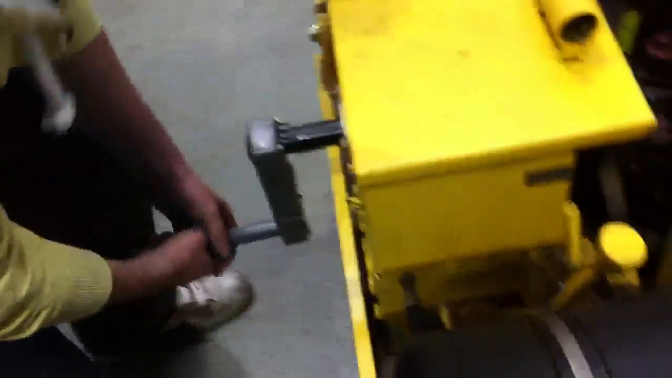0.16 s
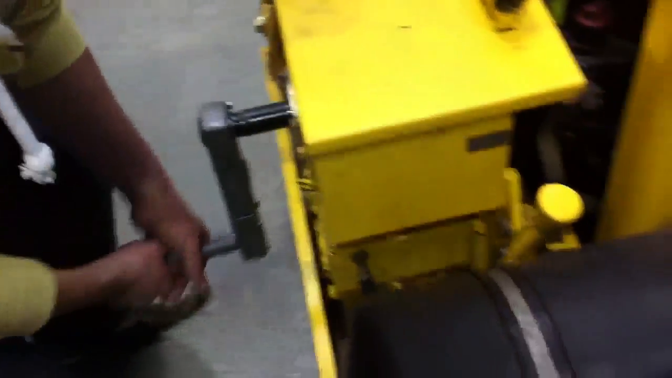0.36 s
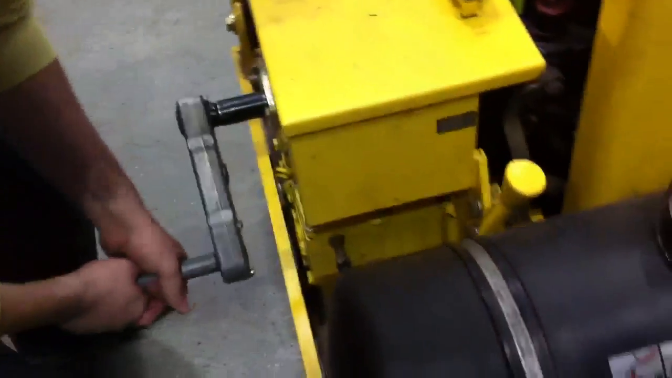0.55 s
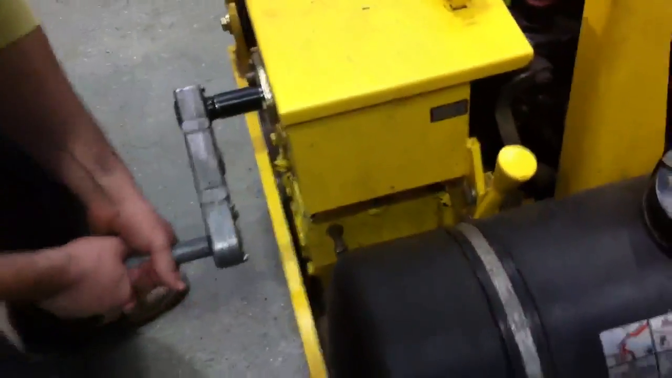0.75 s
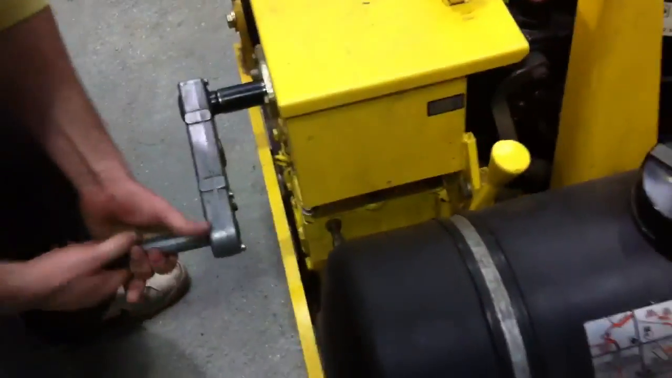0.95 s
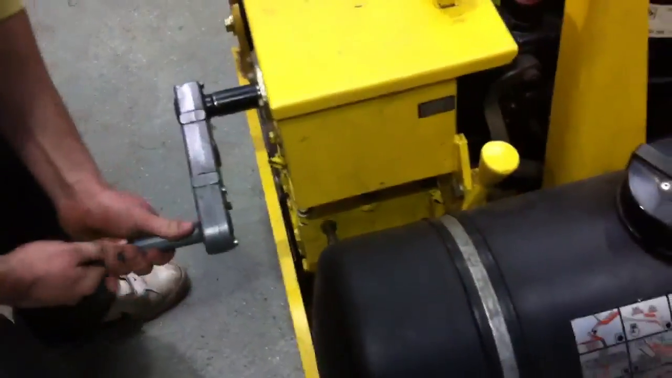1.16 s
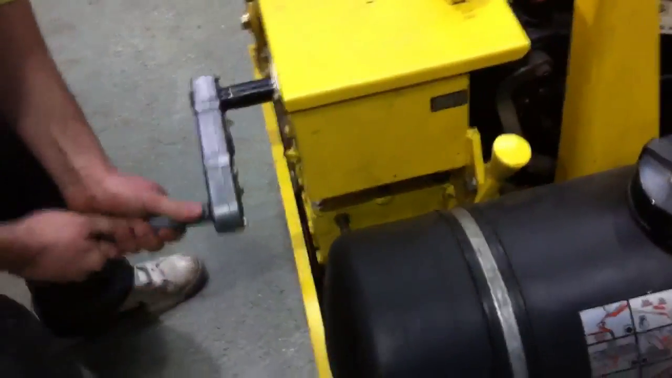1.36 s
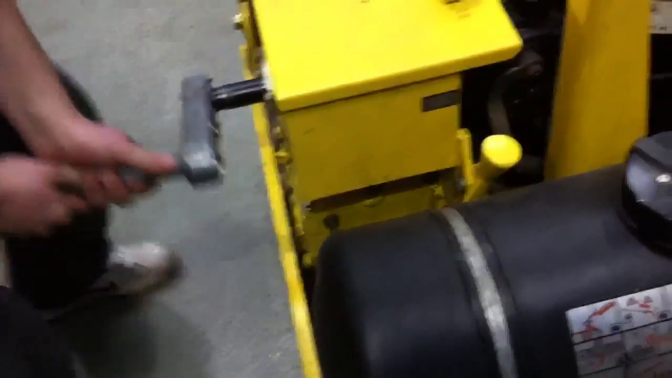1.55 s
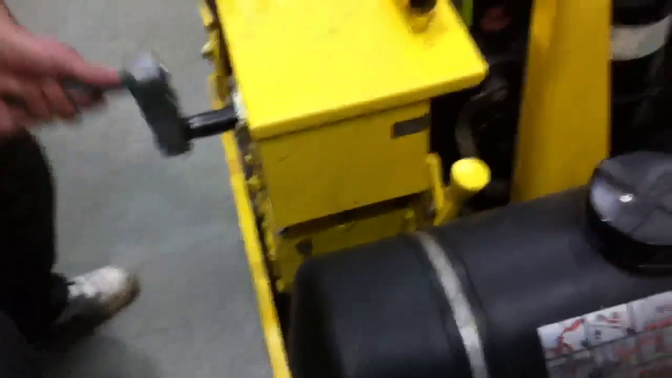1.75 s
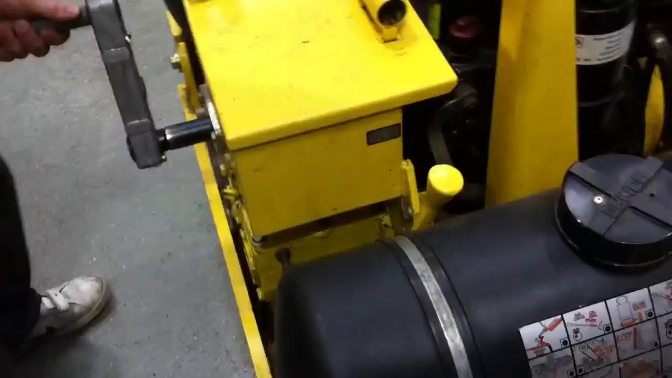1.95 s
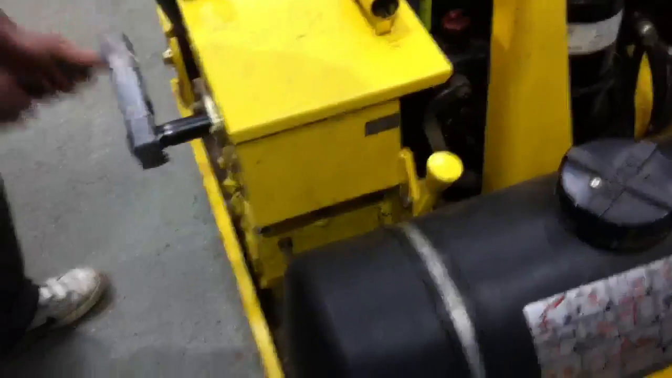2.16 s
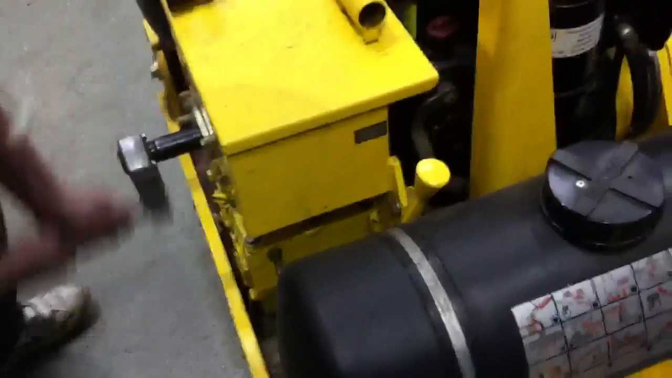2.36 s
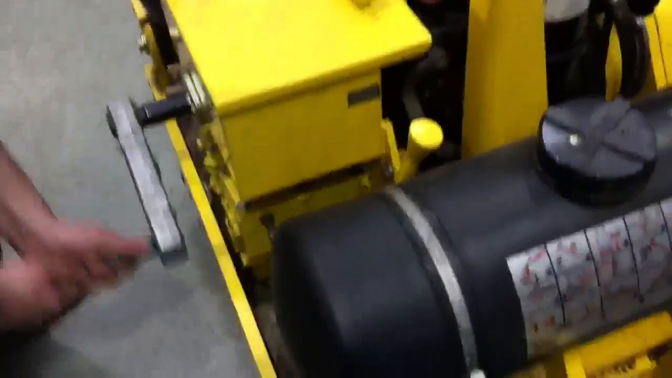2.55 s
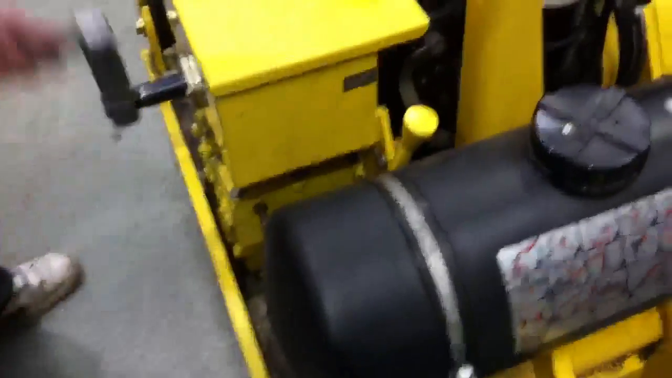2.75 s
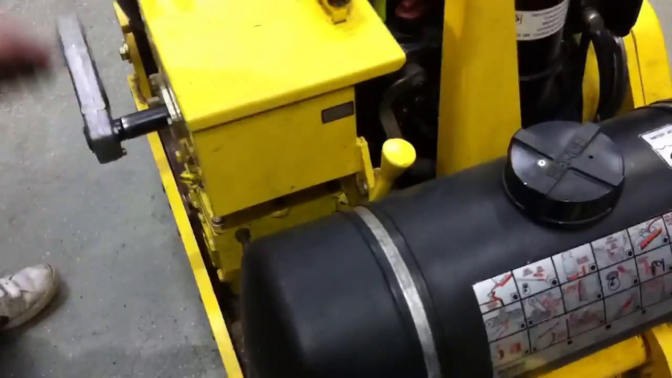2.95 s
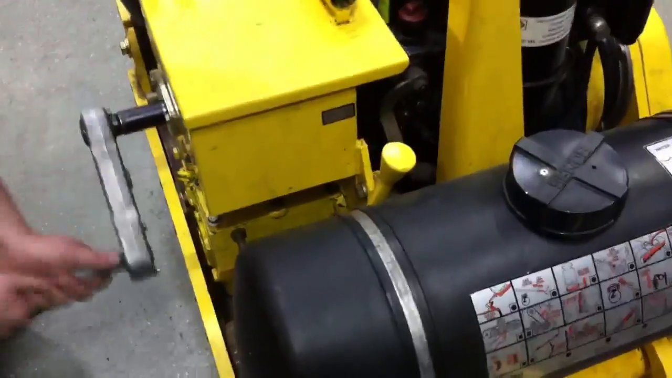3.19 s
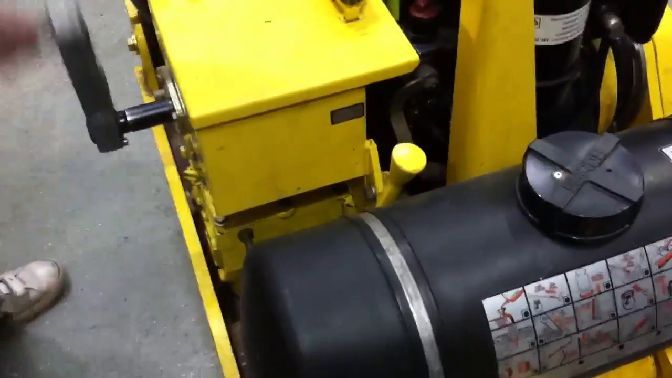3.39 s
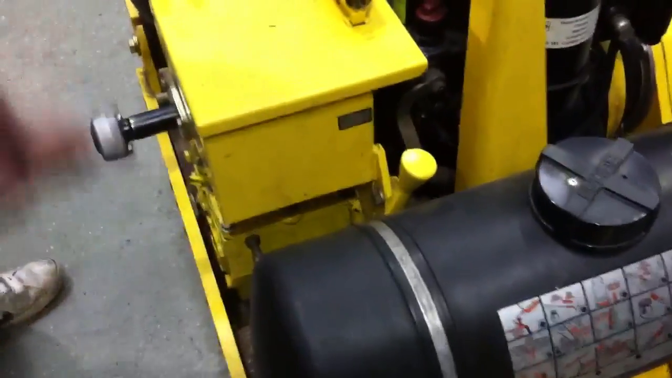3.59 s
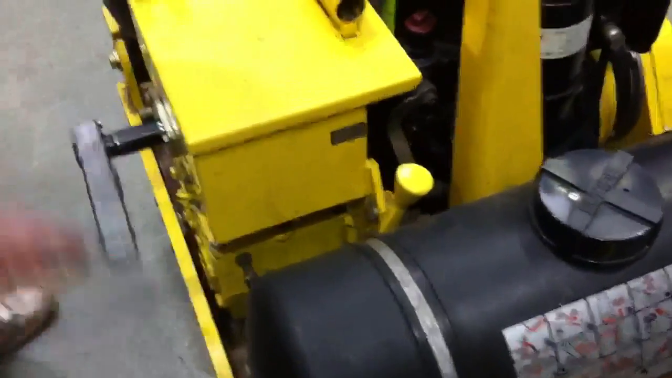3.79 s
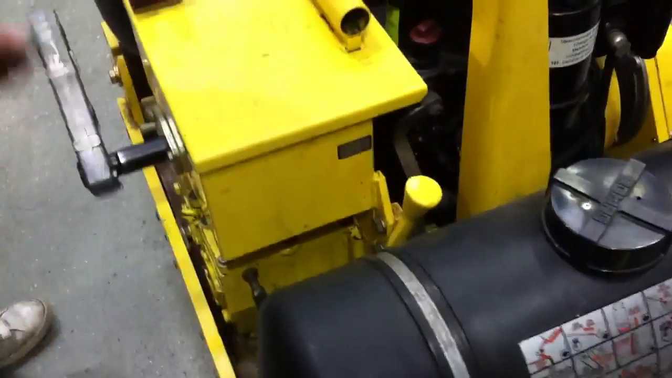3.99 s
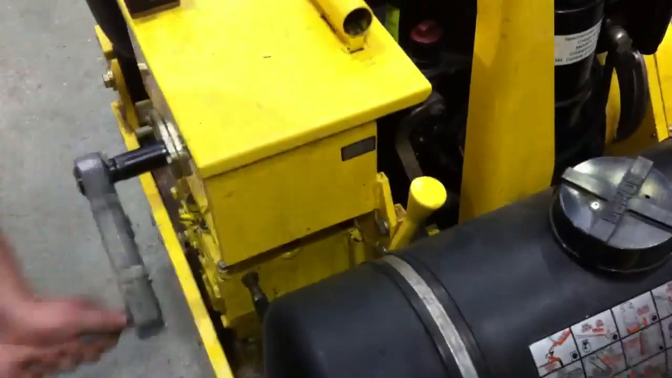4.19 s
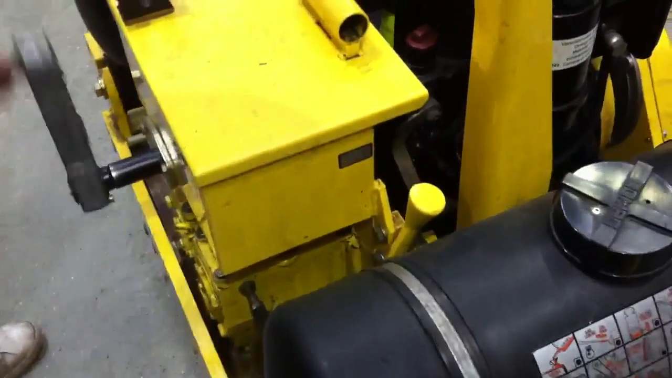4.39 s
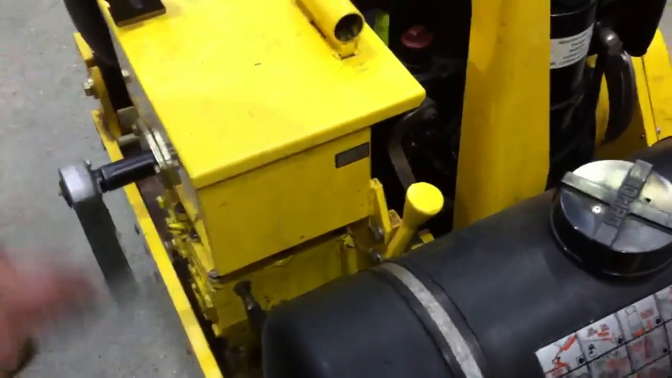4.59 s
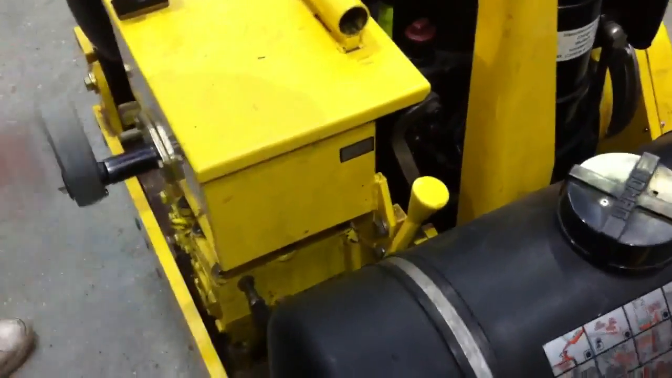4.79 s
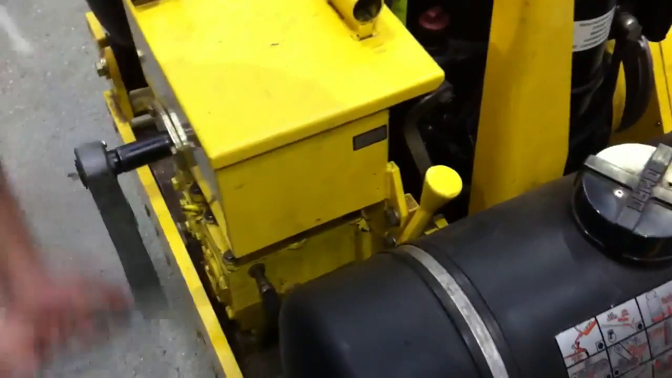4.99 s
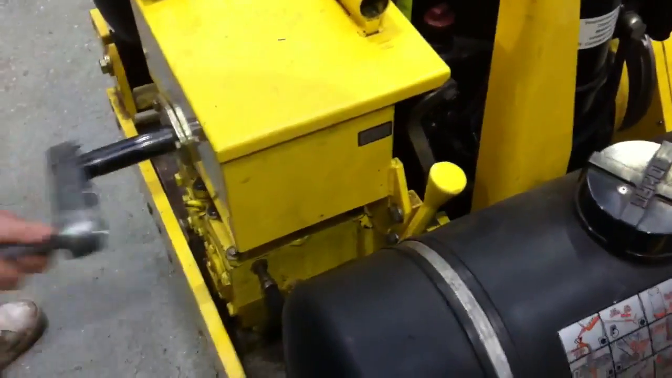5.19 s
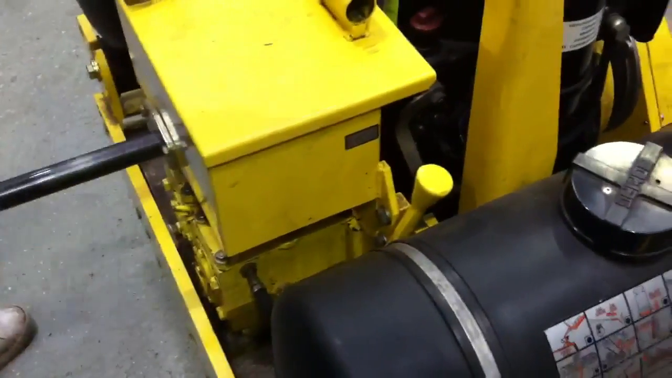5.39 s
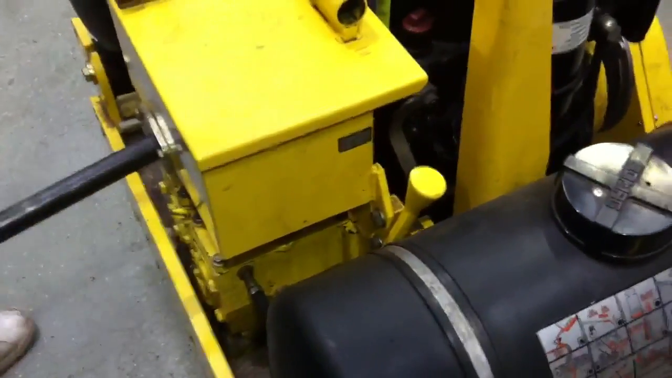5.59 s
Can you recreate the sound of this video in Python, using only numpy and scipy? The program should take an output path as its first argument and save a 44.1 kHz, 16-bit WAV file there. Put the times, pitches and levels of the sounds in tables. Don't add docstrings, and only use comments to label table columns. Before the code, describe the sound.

A small diesel engine is hand-cranked close to the microphone in a workshop with hard walls. For the first 1.6 seconds it is nearly quiet: low distant rumble, faint brushing sleeves, small bumps at 0.1 and 0.3, a clear metal knock at 0.7 as the handle meets its socket, and dull settling until 0.9. At about 1.6 slack is taken up and a pawl starts ticking, crisp and bright, slowly at first, then quickening to a dense rattle by 3 seconds. It surges with each turn, the turns shortening from about 0.6 to 0.45 seconds. Gears hiss and whirr; valves clack hollowly, strongly at 2.8 and 4.7. From 4.9 heavy firings hammer through the booming sheet-metal casing in uneven clusters. Loose parts ping sharply at 5.2 and 5.3, the ticking weakens and stops near 5.3, and a low, rumbling exhaust throb swells until the abrupt end around 5.6.

```python
import sys
import numpy as np
from scipy import signal
from scipy.io import wavfile
from scipy.ndimage import uniform_filter1d, minimum_filter1d

SR = 44100
rng = np.random.default_rng(int(sys.argv[2]) if len(sys.argv) > 2 else 0)


def volts_from_decibels(level):
    exponent = np.asarray(level, float) / 20
    return 10 ** exponent


def store_wav(level_fs):
    pcm = np.round(np.clip(np.atleast_2d(level_fs), -1, 1) * 32767)
    wavfile.write(sys.argv[1], SR, pcm.T.astype(np.int16))


N = 248724


def evened(x):
    return x / np.sqrt(np.mean(x ** 2) + 1e-20)


def ramp(from_s, to_s):
    return np.interp(np.arange(N) / SR, [from_s, to_s], [0, 1])


def after(start_s):
    return 1.0 * (np.arange(N) / SR > start_s)


def band(x, low_hz, high_hz):
    return signal.sosfilt(signal.butter(2, [low_hz, high_hz], "band", fs=SR, output="sos"), x)


def body(drive, modes, wander_db=0):
    out, click = 0, signal.unit_impulse(8192)
    for hz, width_hz, level_db in modes:
        r = np.exp(-np.pi * width_hz / SR)
        poles = [1, -2 * r * np.cos(2 * np.pi * hz / SR), r * r]
        wander = np.interp(np.arange(N), np.linspace(0, N, num=60), rng.standard_normal(60))
        struck = np.r_[click, drive * volts_from_decibels(wander_db * wander)]
        out = out + volts_from_decibels(level_db) * (1 - r) * signal.lfilter([1, 0, -1], poles, struck)
    return out[len(click):] / np.linalg.norm(out[:len(click)])


def noise(points, patchy_db):
    frames, hz = N // 256 + 5, np.fft.rfftfreq(1024, 1 / SR)
    a, b, patches = rng.standard_normal((frames, 513, 3)).T
    patches = uniform_filter1d(patches, size=10, axis=0)
    patches = evened(uniform_filter1d(patches, size=8, axis=1))
    f, db = np.transpose(points)
    shape_db = np.interp(np.log(hz + 1), np.log(f), db)[:, None]
    z = (a + 1j * b) * volts_from_decibels(shape_db + patchy_db * patches)
    return evened(signal.istft(z, nperseg=1024, noverlap=768)[1][:N])


def lumpy(per_s, spread_db):
    size = volts_from_decibels(spread_db * np.minimum(rng.exponential(1, N), 4)) * rng.choice([-1., 1.], N)
    return evened(size * (rng.random(N) < per_s / SR))


# pitch_hz, level_db (per Hz)
RUMBLE = [(15, -60), (25, -28), (97, -13.5), (149, -22), (185, 0), (217, -6.5), (416, -15.5), (714, -16.5),
          (1480, -25.5), (1610, -23.5), (1940, -28.5), (12900, -41), (16000, -43)]
# pitch_hz, level_db (per Hz)
RUSTLE = [(1200, -23), (2500, -2.5), (4000, -4), (7000, -7), (11000, -10), (15500, -15)]
# peak_s, level_db, fall_db_per_s
RUSTLES = [
    (0, -58, 45),
    (.69, -72, 300),
    (1.016, -58.5, 108),
    (1.288, -64, 55),
]


def shop():
    t = np.arange(N) / SR
    rumble = volts_from_decibels(-45.5 - 2 * after(1.25))
    rustle = sum(volts_from_decibels(level_db - fall_db * abs(t - s)) for s, level_db, fall_db in RUSTLES)
    far = volts_from_decibels(-3.0) * rumble * noise(RUMBLE, patchy_db=1.0)
    return far + volts_from_decibels(6.0) * rustle * noise(RUSTLE, patchy_db=2.5)


# pitch_hz, t60_s
WALLS = [(200, 0.37), (1000, 0.94), (4000, 0.49), (12000, 0.048)]


def walls(x):
    taps = np.zeros(SR // 2)
    at = np.arange(200, len(taps) - 20, 20)
    taps[at + rng.integers(0, 20, len(at))] = rng.choice([-1., 1.], len(at))
    hz, t, z = signal.stft(taps, SR, nperseg=256)
    f, t60 = np.transpose(WALLS)
    dying = volts_from_decibels(-60 * t / np.interp(hz, f, t60)[:, None])
    tail = signal.istft(z * dying, SR, nperseg=256)[1]
    return signal.fftconvolve(x, tail / np.linalg.norm(tail))[:N]


# start_s, pitch_hz, level_db, t60_s
PINGS = [(0.682, 1310, -36, 0.036), (0.682, 2390, -37, 0.023), (2.797, 1530, -28, .06),
         (2.829, 1940, -26, .07), (4.955, 1033, -17.5, 0.4), (5.076, 2650, -29, 0.085),
         (5.214, 3200, -7, 0.027), (5.217, 2840, -3.5, 0.023), (5.332, 3200, -6, 0.034),
         (5.332, 2950, -14, 0.064), (5.345, 3300, -14, 0.065), (5.35, 2000, -12, 0.038),
         (5.529, 1040, -19.5, 0.75), (5.532, 3050, -20, .06), (5.618, 3050, -19, .06)]


def pings():
    out, t = np.zeros(N + SR), np.arange(SR // 2) / SR
    for s, hz, level_db, t60 in PINGS:
        pair = np.sin(2 * np.pi * hz * t) + 0.27 * np.sin(2 * np.pi * 1.024 * hz * t)
        swell = 1 - np.exp(-t / 0.00054)
        out[round(s * SR):][:len(t)] += volts_from_decibels(level_db - 60 * t / t60) * swell * pair
    return out[:N]


# time_s, teeth_passed
GETTING_GOING = [(1.6332, -1), (1.6481, 0), (1.699, 1), (1.786, 3), (1.8225, 4), (1.8927, 6), (1.9216, 7),
                 (2.0276, 11), (2.0768, 13), (2.17, 17), (2.2428, 20), (2.2644, 21), (2.3655, 25),
                 (2.505, 31), (2.6337, 37), (2.7703, 44), (2.853, 49), (3.064, 66)]
TURN_ENDS = [3.064, 3.639, 4.154, 4.608, 5.051, 5.52]
STROKE = [(0, 0), (7, .158), (13, .32), (19, .476), (26, .64), (32, .755), (40, .885), (47, 1)]
TURN_TEETH = 47


def crank():
    s, teeth = np.transpose(GETTING_GOING)
    tooth, share = np.transpose(STROKE[1:])
    for start, end in zip(TURN_ENDS, TURN_ENDS[1:]):
        s = np.r_[s, start + share * (end - start)]
        teeth = np.r_[teeth, teeth[-1] + tooth]
    return s, teeth


# time_s, level_db
EFFORT = [(1.63, -43), (1.8, -29), (2.0, -29), (2.2, -29), (2.6, -25.5), (2.82, -23.5), (2.92, -25),
          (3.3, -23), (4.0, -21.5), (4.7, -22), (4.9, -19.5), (5.03, -20), (5.3, -18.5), (5.64, -18.5)]


def running():
    t = np.arange(N) / SR
    effort = np.interp(t, *np.transpose(EFFORT), left=-120)
    caught = ramp(5.14, 5.48)
    angle = np.interp(t, *crank())
    heave_db = 8 - 4 * ramp(2.4, 3.4) - 4 * caught
    heave = heave_db * np.cos(8 * np.pi * (angle - 10.5) / TURN_TEETH)
    sway_db = 1.5 * ramp(2.35, 3.0) * (1 - caught)
    sway = sway_db * np.cos(2 * np.pi * (angle - 8.1) / TURN_TEETH)
    shake = -14.5 + 10.5 * caught + sway
    rumble = -12.5 + 10.5 * caught + heave
    thrum = -25.5 + 14 * caught - 20 * (1 - after(4.34))
    return volts_from_decibels(effort + [0 * caught, shake, rumble, thrum])


# pitch_hz, width_hz, share_removed
DIPS = [(2700, 350, .6), (4180, 400, .85), (5750, 550, .8), (9000, 400, .75), (12200, 400, .45)]


def dipped(x):
    for hz, width_hz, share in DIPS:
        x = x - share * signal.lfilter(*signal.iirpeak(hz, hz / width_hz, SR), x)
    return x


# pitch_hz, width_hz, level_db
SNAP = [(6110, 390, -3), (6820, 126, 1), (7210, 160, -4), (8400, 1740, 0), (9240, 120, 0.5),
        (10050, 540, 0), (11380, 1100, 1.5), (12640, 990, -1), (14000, 880, -10), (15200, 300, -4)]


def tooth_resonance(drive, wander_db):
    return body(drive, SNAP, wander_db)


# pitch_hz, width_hz, level_db
RING = [(1788, 300, -0.5), (2340, 150, -3.5), (3200, 38, 3), (3363, 140, 6.5), (4780, 380, -4)]


def wheel_resonance(drive, wander_db):
    return body(drive, RING, wander_db)


# pitch_hz, level_db (per Hz)
WHIRR = [(60, -18.5), (240, -18), (500, -5.5), (900, -5), (1400, -15.5), (3000, -10), (5000, -12.5),
         (12000, -21.5), (16200, -41)]


def meshing_gears():
    freed = ramp(4.98, 5.35)
    easing_db = 1.8 * ramp(2.15, 2.6) * (1.5 - ramp(2.72, 2.8))
    mesh = lumpy(per_s=9000, spread_db=4.0) * volts_from_decibels(-7 * freed - easing_db)
    wash_db = -5.5 + 3.7 * freed - 6 * (1.5 - ramp(2.4, 2.7))
    hiss = volts_from_decibels(-5.5) * tooth_resonance(mesh, wander_db=4.0)
    hiss = hiss + volts_from_decibels(-14.5) * wheel_resonance(mesh, wander_db=-1.0)
    return dipped(hiss + volts_from_decibels(wash_db) * noise(WHIRR, patchy_db=4.0))


# start_s, level_db, weight_db, contact_ms
HANDLING = [
    (.131, -52, 12, 18),
    (0.302, -37.5, -4.5, 10),
    (0.679, -24, -13.5, 9.8),
    (.70, -44.5, 3, 21),
    (.824, -38, -3, 12),
    (.853, -37, 9.5, 8.4),
    (.884, -47, 18.5, 4.5),
    (2.233, -20, -23, 3.4),
]
SEATING = [
    (1.595, -45, 0, 29),
    (1.626, -33.5, -10, 21),
    (1.769, -33, -5, 8.9),
]
VALVES = [(2.044, -27, -34, 7.8), (2.358, -36.5, 1, 16), (2.612, -25, -18, 7.4), (2.694, -42, 11, 10),
          (2.797, -20, 7.5, 22.3), (2.827, -15.5, 5, 11.8), (2.978, -27, -2.5, 14), (3.154, -23, -10, 8),
          (3.296, -28, -29, 11), (3.437, -21, -4, 15), (3.57, -21, -5, 3.9), (3.713, -25, -13, 7.4),
          (3.84, -22, -6, 7.8), (3.967, -23, -10, 14), (4.04, -33, 9.5, 12), (4.213, -26.5, -10, 17),
          (4.463, -28, -17, 13), (4.09, -22, -18, 4.1), (4.672, -24, -7, 12), (4.697, -15.5, -3, 16)]
FIRINGS = [(4.898, -14, 2, 19.5), (4.926, -12.5, -8.5, 17), (4.954, -14, 4, 3.5), (5.073, -11.5, 0, 4.6),
           (5.167, -26, 5.5, 54), (5.212, -14.5, -2, 12.4), (5.243, -23, -37, 9.6), (5.331, -13, 1, 9.7),
           (5.35, -17.5, -2.5, 21), (5.385, -24.5, 4, 7.9), (5.436, -15, -2, 9.5), (5.456, -17, -9, 23),
           (5.482, -24, -14, 2.8), (5.525, -18, -5, 22), (5.552, -20.5, -32, 10.4), (5.573, -18.5, 0, 13),
           (5.618, -17, -3, 18)]
# boom_db, panel_db, clank_db, fizz_db
STIRS = [
    (0, 7, -11.5, -33),
    (0, 7, 6, -28),
    (0, 2, 5, 5),
    (0, 3.5, 5, 0.5),
]
WEIGHT_SHARES = (1, 0.43, -0.06, -0.29)
RISE_SHARES = np.array([[.4], [.45], [.3], [.15]])


def blows():
    drives = np.zeros((4, N + 4000))
    ms = np.arange(4000) / SR * 1000
    for rows, stirs_db in zip([HANDLING, SEATING, VALVES, FIRINGS], STIRS):
        for s, level_db, weight_db, contact_ms in rows:
            contact = np.clip(contact_ms, 1, 30) * np.array([[.6], [1.], [.7], [.5]])
            envelope = (1 - np.exp(-ms / (RISE_SHARES * contact))) * np.exp(-ms / contact)
            burst = envelope * rng.standard_normal((4, len(ms)))
            push = np.exp(-(ms / (2 * contact[0])) ** 2)
            burst[0] = 0.15 * np.sin(2 * np.pi * 0.248 * ms) * push
            gains = volts_from_decibels(level_db + np.add(stirs_db, weight_db * np.array(WEIGHT_SHARES)))
            drives[:, round(s * SR):][:, :len(ms)] += gains[:, None] * burst
    return drives[:, :N]


# pitch_hz, width_hz, level_db
BOOM = [(175, 18, -15), (239.3, 8.5, 4), (251.6, 13, -6), (273, 40, -4), (334.5, 28, -10)]
PANEL = [(420, 148, -3.5), (580, 93, 1), (664, 120, 3.5), (737, 82, 4.5), (861, 53, 3.5), (1040, 38, 0),
         (1204, 39, -12), (1250, 57, -18)]
CLANK = [(1630, 250, 10), (1947, 71, 8), (2290, 250, 10), (2640, 190, 6), (3200, 184, 0), (3900, 560, -0.5)]
THRUM = [(121, 59, -16), (157.4, 32, 11)]


def casing():
    boom, panel, clank, fizz = blows()
    whirr, shake, rumble, exhaust = running()
    boom = boom + volts_from_decibels(1.0) * shake * lumpy(per_s=300, spread_db=4.5)
    panel = panel + volts_from_decibels(-3.0) * rumble * lumpy(per_s=900, spread_db=4.5)
    thrum = body(volts_from_decibels(3.0) * exhaust * lumpy(per_s=220, spread_db=2.5), THRUM)
    low = band(body(boom, BOOM) + thrum, low_hz=121, high_hz=900)
    low = low + band(body(panel, PANEL, wander_db=1.9), low_hz=293, high_hz=2000)
    high = band(body(clank, CLANK), low_hz=1180, high_hz=5000)
    high = high + 1.32 * band(fizz, low_hz=4660, high_hz=14000)
    return low + high + whirr * meshing_gears()


# share_of_turn, bite_db
BITE = [(0, 3), (.08, -1.5), (.25, 5.5), (.37, 2), (.405, 9.5), (.43, 10), (.52, 1.5), (.66, -2),
        (.99, 8.5)]


def pawl(rise_ms=0.72, snap_ms=0.66, rattle_ms=7.37, uneven_db=1.5):
    s, teeth = crank()
    tooth = np.arange(-1, np.interp(5.27, s, teeth))
    at = np.round(np.interp(tooth, teeth, s) * SR).astype(int)
    place = 1 - (19 - tooth) % TURN_TEETH / TURN_TEETH
    bite = np.interp(place, *np.transpose(BITE))
    uneven = uneven_db * rng.standard_normal((len(at), 3)).T * [[1], [.4], [.4]]
    loose = -6.5 * after(4.94)[at]
    loose = loose - 10 * (tooth < 0)

    snap_db = -12 + bite + 0.5 * (abs(tooth - 16) < 3.5)
    rattle_db = -18.5 + 0.1 * bite - 5 * ramp(1.5, 4.2)[at]
    ring_db = -27.5 - 1.4 * bite
    trains = np.zeros((3, N))
    trains[:, at] = volts_from_decibels(uneven + loose + [snap_db, rattle_db, ring_db])

    ms = np.arange(3000) / SR * 1000
    rise = (1 - np.exp(-ms / rise_ms)) ** 2
    short, long = 2 * rise * np.exp(-ms / snap_ms), rise * np.exp(-ms / rattle_ms)
    shapes = np.array([short, long, short + 0.41 * long])
    scrapes = signal.oaconvolve(trains, shapes, axes=1)[:, :N]
    snaps, rattles, rings = scrapes * rng.choice([-1., 1.], N)

    bright = tooth_resonance(snaps + rattles, wander_db=2.0)
    bright = bright + volts_from_decibels(-33.0) * np.diff(snaps, prepend=0)
    bright = bright + volts_from_decibels(-4.5) * band(rattles, low_hz=2000, high_hz=7600)
    rings = rings + volts_from_decibels(-19) * rattles
    return dipped(bright + wheel_resonance(rings, wander_db=1.4))


def scene():
    engine = pawl() + casing() + pings()
    return (engine + volts_from_decibels(-11.0) * walls(engine) + shop())[None]


def gate(x, from_hz=3000):
    below_db, depth_db = 15, 12
    hz, t, z = signal.stft(x, SR, nperseg=128, noverlap=96)
    power = uniform_filter1d(uniform_filter1d(abs(z) ** 2, size=2, axis=1), size=7, axis=2)
    level_db = 10 * np.log10(power + 1e-14)
    coming_db = -minimum_filter1d(minimum_filter1d(-level_db, 9, axis=1), 15, axis=2, origin=-6)
    excess_db = np.clip(below_db + level_db - coming_db, -50, 50)
    shut = 1 / (1 + np.exp(excess_db)) * (hz > from_hz)[:, None]
    return signal.istft(z * volts_from_decibels(-depth_db * shut), SR, nperseg=128, noverlap=96)[1][:, :N]


def roll_off(x):
    return signal.sosfilt(signal.butter(12, 16650, fs=SR, output="sos"), x)


def record(dry):
    x = signal.sosfilt(signal.butter(2, 90, "high", fs=SR, output="sos"), dry)
    x = gate(x / (1 + (x / .96) ** 4) ** .25)
    low_pass = signal.firwin(255, 15760, window=("kaiser", 7), fs=SR)
    x = signal.oaconvolve(x, low_pass[None], "same")
    return roll_off(x)


dry = scene()
out = record(dry)
store_wav(out)
```